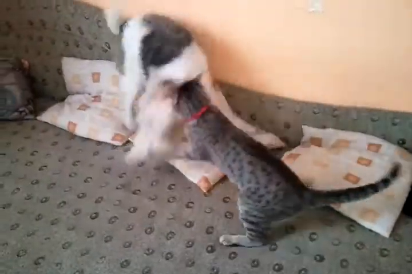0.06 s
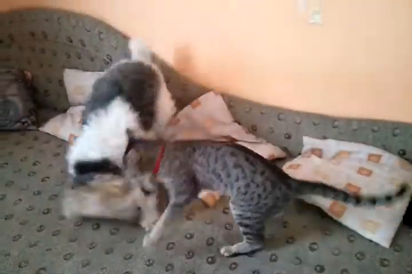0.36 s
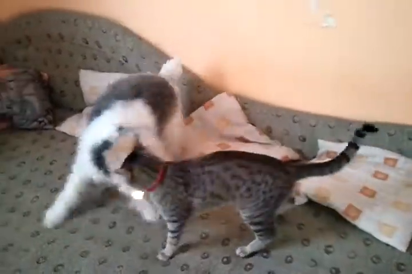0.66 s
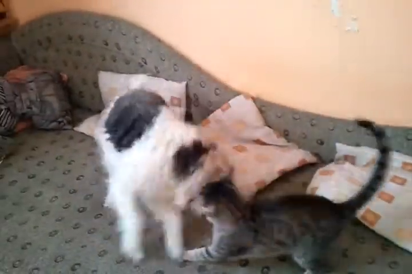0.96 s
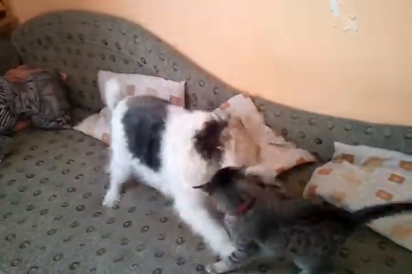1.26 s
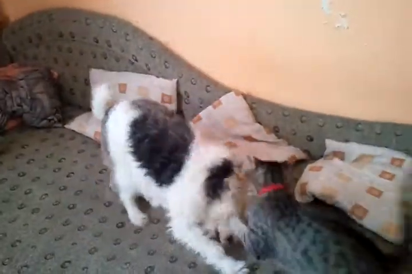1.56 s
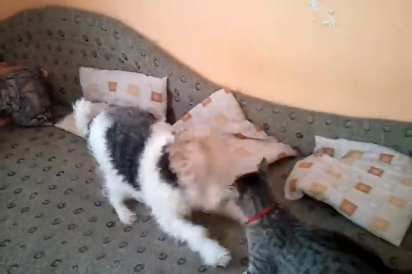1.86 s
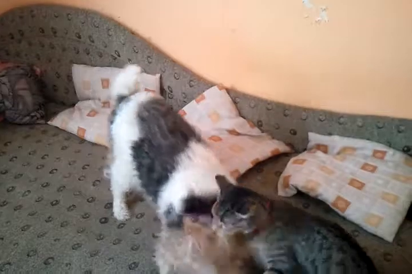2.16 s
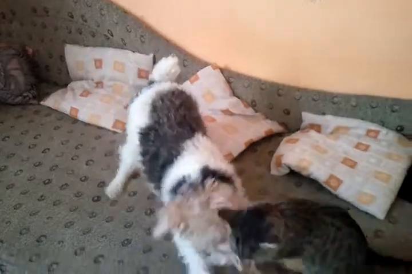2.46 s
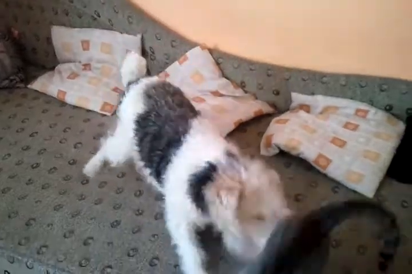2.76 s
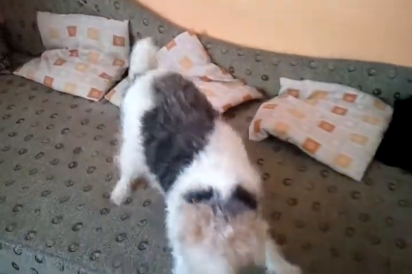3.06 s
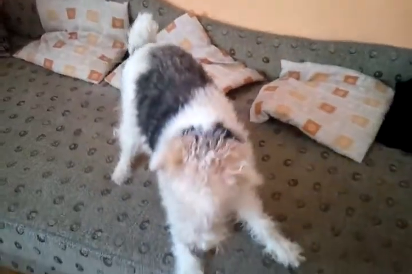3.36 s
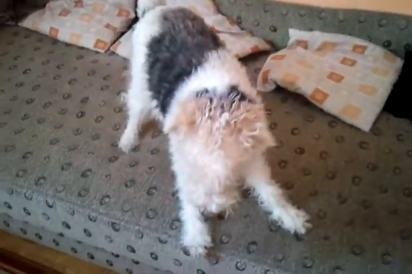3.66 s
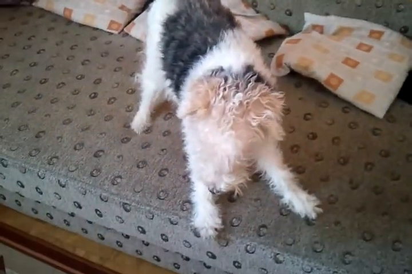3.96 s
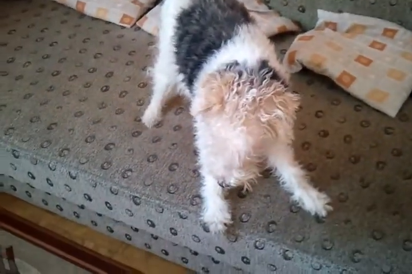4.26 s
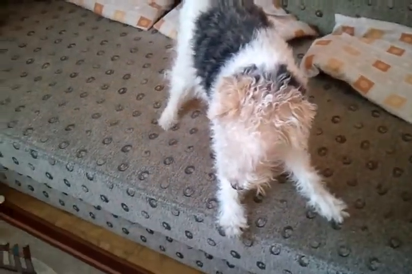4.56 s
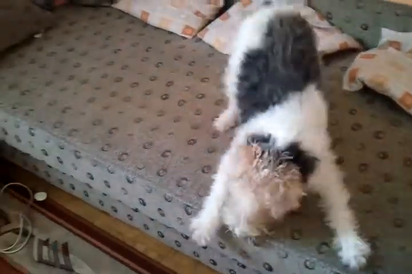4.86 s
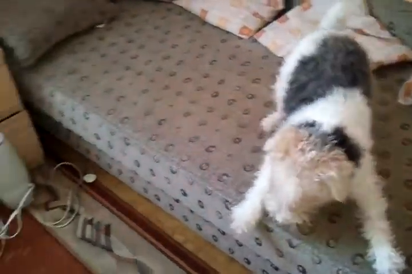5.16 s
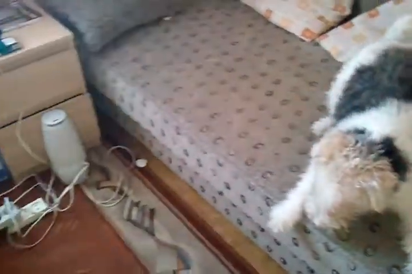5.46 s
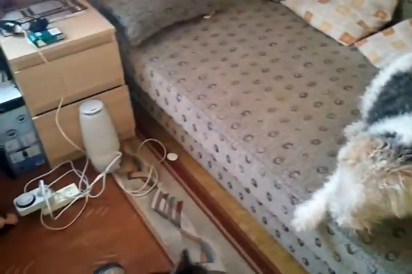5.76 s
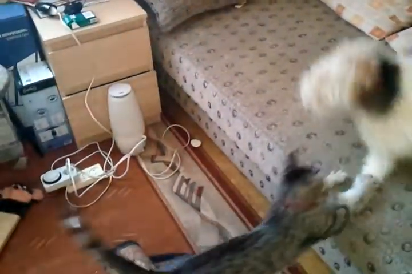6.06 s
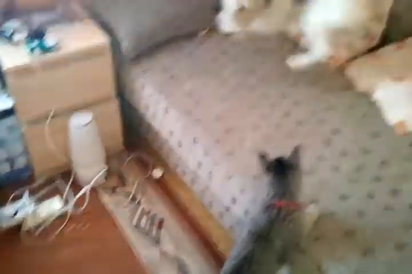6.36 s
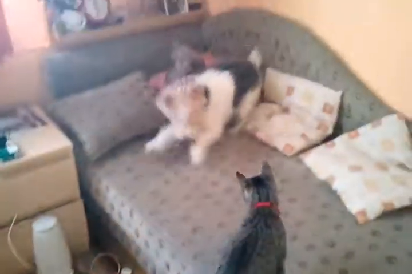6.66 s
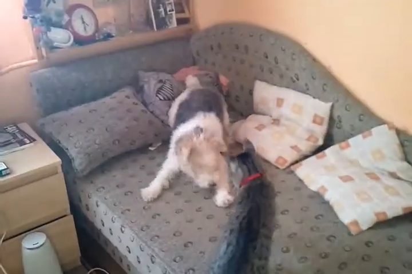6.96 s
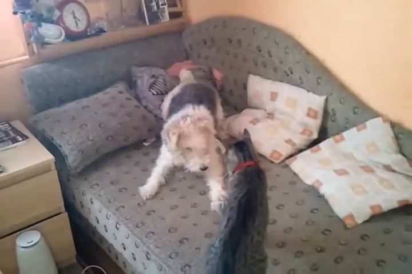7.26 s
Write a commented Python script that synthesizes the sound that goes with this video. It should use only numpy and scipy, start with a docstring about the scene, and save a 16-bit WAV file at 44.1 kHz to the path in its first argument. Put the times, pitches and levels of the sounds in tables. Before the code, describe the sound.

A dog and a cat wrestle on a sofa in a small, quiet room. Paws thump the cushions and hollow frame, fur and claws scrape the cover, and a small bell on the cat's collar jingles brightly with each lunge. Midway the thumps ease while the bell tinkles on. After a brief shuffle and a lull, the thudding and jingling return. A faint deep rumble lies underneath.

```python
"""Dog and cat wrestling on a sofa

In a small, quiet room, paws thump the cushions and the hollow frame over a deep rumble.
Fur and claws scrape across the cover. With every lunge, the pellet in a small bell
on the cat's collar strikes the metal shell and rattles around inside it."""
import sys
import numpy as np
from scipy import signal
from scipy.fft import rfft, irfft
from scipy.io import wavfile

SR = 44100
rng = np.random.default_rng(int(sys.argv[2]) if len(sys.argv) > 2 else 0)


def transcribe(u):
    """Save the signal u as a 16-bit wav file named by the first command-line argument.

    u: samples, shape (n,) or (channels, n), limited to [-1, 1]; the rate is SR.
    q: integer samples, one column per channel.
    """
    v = np.clip(np.atleast_2d(u).T, -1, 1)
    q = np.round(v * 32767).astype(np.int16)
    wavfile.write(sys.argv[1], SR, q)


N = 326295
TIME = np.arange(N) / SR
AGE = TIME[:SR // 2]  # seconds since one short sound began


def undb(db):
    """Turn decibels into a gain to multiply by."""
    return 10 ** (np.asarray(db) / 20)


def unit(x):
    """Scale a sound to an average (rms) level of 1."""
    return x / np.sqrt(np.mean(x ** 2))


def add(track, start_s, sound):
    """Mix a sound into the track at its start time."""
    start = max(int(start_s * SR), 0)
    track[start:start + len(sound)] += sound[:max(N - start, 0)]


def colour(x, points):
    """Filter a sound to follow a tone curve of (Hz, dB) points, at an average level of 1."""
    hz, db = np.transpose(points)
    freqs = np.maximum(np.fft.rfftfreq(2 * SR, 1 / SR), 1)
    gains = undb(np.interp(np.log(freqs), np.log(hz), db))
    # this keeps the filter from ringing before the sound arrives
    cepstrum = irfft(np.log(gains))
    cepstrum[1:SR] *= 2
    cepstrum[SR:] = 0
    response = irfft(np.exp(rfft(cepstrum)))[:SR // 2]
    return unit(signal.fftconvolve(x, response)[:len(x)])


def noise(points):
    """Steady noise that follows a tone curve."""
    return colour(rng.standard_normal(N), points)


def fade(t60):
    """Die away by 60 dB in t60 seconds, the fade time."""
    return np.exp(-np.log(1000) * AGE / t60)


def wander(rate, size):
    """Drift to a new random value, rate times a second."""
    targets = rng.standard_normal(4096)
    return np.interp(TIME[:size] * rate, np.arange(len(targets)), targets)


def grains(rate, spread_db):
    """Tiny random clicks, about rate a second: most are weak, a few are strong."""
    happens = rng.random(N) < rate / SR
    strength = np.minimum(rng.exponential(size=N), 5)
    return happens * undb(spread_db * strength) * rng.choice([-1, 1], N)


def room(x, echo_db, t60):
    """Add the short echo of a furnished room."""
    tail = rng.standard_normal(len(AGE)) * fade(t60) * (AGE > .003)
    return x + undb(echo_db) * signal.fftconvolve(x, tail / np.linalg.norm(tail))[:N]


# How the rumble rises and falls. Each row: time in seconds, level in dB.
RUMBLE_LEVELS = [(0.0, -28), (0.1, -31.5), (0.82, -46), (0.91, -37.5), (1.3, -50), (1.38, -32),
                 (1.59, -46.5), (2.47, -37.5), (2.66, -52.5), (2.78, -42), (4.53, -67.5), (4.88, -29.5),
                 (5.23, -53.5), (5.85, -56), (5.98, -31.5), (6.45, -33.5), (7.36, -48), (7.4, -63)]
# Tone curves of the rumble and the quiet room. Each row: frequency in Hz, level in dB.
RUMBLE_TONE = [(5, -12.5), (10, 3.5), (14, 5), (21, -7), (35, -15.5), (60, -34), (110, -54.5), (300, -64)]
QUIET_ROOM_TONE = [(25, 20.5), (50, 15.5), (70, -3.5), (102, 8.5), (140, -2), (260, -7.5), (380, -9),
                   (490, -3.5), (700, -10.5), (2000, -14), (9000, -14.5), (14500, -18)]


def background(room_db=-60.5):
    """A deep rumble swells as the animals bounce, over the faint hiss of the room."""
    times, levels_db = np.transpose(RUMBLE_LEVELS)
    rumble = undb(np.interp(TIME, times, levels_db)) * noise(RUMBLE_TONE)
    return rumble + undb(room_db) * noise(QUIET_ROOM_TONE)


# The notes of the box under the seat. Each row: pitch in Hz, level in dB, fade time in seconds.
BOX_NOTES = [(261.9, 16.5, 0.15), (369.7, 8.5, 0.24), (447, -29, 0.36), (588, 7, 0.25), (673, 4.5, 0.2),
             (797, 8, 0.34), (992, 9.5, 0.012), (1120, 4.5, 0.013), (1248, 4, 0.13), (1382, -0.5, 0.075),
             (1723, 0.5, 0.13), (2220, -9, 0.14)]


def hollow_box(x, ring_db=-13):
    """A touch on the seat also rings the hollow box below it."""
    ring = sum(undb(db) / np.sqrt(t60) * fade(t60) * np.sin(2 * np.pi * hz * AGE)
               for hz, db, t60 in BOX_NOTES)
    return x + undb(ring_db) * signal.fftconvolve(x, ring / np.linalg.norm(ring))[:N]


def push(length_s, release_s, rise_s=0.025):
    """The loudness of one slide: the push builds up, then friction stops the body."""
    return np.minimum(AGE / rise_s, 1) * np.exp(-np.maximum(AGE - length_s, 0) / release_s)


# A body or paw slides over the sofa. Each row: start in seconds, length of the push in seconds,
# cover scrape in dB, fur hiss in dB, seat shudder in dB.
BODY_SLIDES = [(0.0, 0.01, -44, -52, -44), (0.059, 0.071, -59.5, -74, -40),
               (0.241, 0.036, -49.5, -54.5, -56), (0.30, 0.079, -64, -65, -58.5),
               (0.481, 0.17, -58.5, -64, -57), (0.654, 0.052, -45, -59.5, -80),
               (0.698, 0.027, -40.5, -66, -68), (0.798, .07, -57.5, -58.5, -49.5),
               (0.88, 0.062, -60, -72, -54.5), (0.976, 0.067, -62, -51.5, -66),
               (1.088, 0.026, -54, -68, -82), (1.134, 0.019, -88, -48.5, -82), (1.2, 0.15, -82, -63, -68),
               (1.334, 0.12, -57, -61, -54.5), (1.496, 0.016, -50.5, -53, -58),
               (1.598, 0.069, -66, -52.5, -55.5), (1.728, .06, -57.5, -62.5, -73),
               (1.818, 0.055, -61.5, -69, -55), (2.06, 0.029, -52, -57, -47.5),
               (2.109, 0.078, -53.5, -54.5, -53), (2.173, 0.057, -52.5, -50.5, -50.5),
               (2.268, 0.13, -58.5, -59, -56), (2.399, 0.068, -66, -56.5, -83),
               (2.479, 0.034, -59, -78, -65), (2.658, 0.029, -61, -66.5, -62),
               (2.724, .1, -51, -57.5, -56.5), (2.83, 0.086, -54.5, -58.5, -57),
               (2.909, 0.038, -52, -53.5, -45), (2.973, 0.065, -47.5, -58, -50),
               (3.178, 0.091, -73, -59, -64), (4.59, .05, -73, -72, -73.5), (4.718, 0.027, -44, -47.5, -51),
               (4.76, 0.017, -63, -68, -56), (4.808, 0.078, -58, -66, -55), (5.168, 0.037, -68.5, -64, -63),
               (5.923, .04, -51.5, -57.5, -50), (5.964, 0.059, -43, -54.5, -53),
               (6.034, 0.054, -46.5, -52.5, -60), (6.112, 0.078, -51.5, -60, -56),
               (6.163, 0.072, -47.5, -51, -50.5), (6.274, 0.037, -53, -55.5, -62),
               (6.446, .075, -45.5, -56, -50.5), (6.568, 0.096, -56.5, -60.5, -55),
               (6.678, 0.041, -55.5, -54.5, -74), (6.778, 0.14, -55.5, -61, -48),
               (7.12, 0.051, -58, -77, -60), (7.364, .04, -55.5, -66, -56)]
# Tone curves of the cover, the fur and the seat. Each row: frequency in Hz, level in dB.
COVER_TONE = [(150, -21.5), (300, -1), (500, -1), (850, 0), (1350, 3), (2050, -2), (2900, -12.5),
              (4200, -15.5), (6000, -40)]
FUR_TONE = [(1500, -5.5), (2900, -15.5), (4200, 0.5), (6000, -5), (7800, 1), (9500, -5), (11200, -7.5),
            (12200, -17), (15000, -36)]
SEAT_TONE = [(40, -25), (70, 5), (105, -2), (135, -2), (170, 7), (210, -12.5), (265, 2), (400, -9),
             (600, -13), (1100, -42)]


def sliding(level_db=-1, jerk_db=2):
    """Bodies slide in jerks: the woven cover rasps, fur hisses and the seat shudders."""
    cover, fur, seat = np.zeros((3, N))
    for start, length, cover_db, fur_db, seat_db in BODY_SLIDES:
        add(cover, start, undb(cover_db) * push(length, release_s=0.021))
        add(fur, start, undb(fur_db) * push(length, release_s=0.021))
        add(seat, start, undb(seat_db) * push(length, release_s=0.032))  # springs shake on longer
    jerks = undb(jerk_db * wander(55, N))
    rasp = cover * colour(grains(rate=1000, spread_db=1), COVER_TONE)
    hiss = fur * colour(grains(rate=6300, spread_db=3), FUR_TONE)
    shudder = seat * noise(SEAT_TONE)
    slides = hollow_box(jerks * rasp) + jerks * (hiss + shudder)
    return undb(level_db) * room(slides, echo_db=-10, t60=0.33)


# Claws catch in the cover. Each row: start in seconds, level in dB.
CLAW_CATCHES = [(0.174, -37), (0.64, -56), (0.671, -40), (0.6985, -31), (0.7166, -40), (0.853, -36),
                (1.483, -38), (2.0654, -37.5), (2.942, -40.5), (4.7349, -41.5), (4.7707, -34.5),
                (4.88, -57), (6.2887, -36), (6.7255, -42)]
# Tone curve of a snapping thread. Each row: frequency in Hz, level in dB.
SNAP_TONE = [(300, 5), (900, -6), (1700, -1.5), (2800, -6.5), (4500, -7), (8000, -10.5), (14000, -42)]


def claws(level_db=-2, snap_t60=0.016):
    """Threads snap off the claw tips, each a tiny burst of noise."""
    snaps = np.zeros(N)
    for start, db in CLAW_CATCHES:
        add(snaps, start, undb(db + level_db) * fade(snap_t60))
    return room(snaps * noise(SNAP_TONE), echo_db=1.5, t60=0.15)


# Paws land on the sofa. Each row: start in seconds, pat on the cover in dB, boom of the frame in dB,
# pitch of the spot that is hit in Hz.
PAW_LANDINGS = [(0.02, -56, -35.5, 288), (0.065, -26, -21, 336), (0.172, -31, -37, 254),
                (0.209, -42, -38, 275), (0.264, -54, -46, 238), (0.3, -36.5, -49.5, 350),
                (0.395, -36.5, -55, 765), (0.473, -39.5, -53, 242), (0.638, -33, -77, 1390),
                (0.802, -37.5, -48.5, 378), (0.812, -34, -54, 586), (0.961, -43.5, -53.5, 258),
                (1.339, -32.5, -52, 296), (1.484, -26, -76, 760), (1.738, -52.5, -64, 266),
                (1.835, -38, -65, 237), (1.872, -44, -56, 252), (1.918, -42, -55, 256),
                (2.063, -33.5, -44, 587), (2.2, -29, -40.5, 240), (2.325, -38, -54, 926),
                (2.754, -40, -70, 353), (2.941, -41, -45, 285), (2.993, -28, -44, 1080),
                (3.182, -39, -51, 224), (4.739, -34.5, -66, 415), (4.766, -31.5, -66, 260),
                (4.869, -36, -50, 384), (5.067, -51.5, -70, 252), (5.98, -29.5, -68, 258),
                (6.004, -25, -49, 282), (6.091, -63, -41, 242), (6.284, -29.5, -47.5, 2550),
                (6.454, -40.5, -42, 286), (6.508, -42, -59, 940), (6.576, -30.5, -45.5, 607),
                (6.785, -32.5, -48, 260), (6.826, -33, -39, 330), (6.894, -60, -42, 275),
                (7.038, -45.5, -79, 243), (7.126, -41.5, -82, 270), (7.371, -37.5, -70, 235)]
# The low notes of the sofa frame. Each row: pitch in Hz, level in dB, fade time in seconds.
FRAME_NOTES = [(102, 2, .27), (57, -3, .2), (170, -4, .19), (258, -9, .17), (355, -14, .15),
               (440, -18, .12)]
# Tone curves of a pat on cloth and a knock on wood. Each row: frequency in Hz, level in dB.
PAT_TONE = [(80, -26), (170, -11), (280, 0.5), (500, -3), (1000, 0), (1800, 0), (2800, -10), (8000, -71)]
KNOCK_TONE = [(250, -32), (600, 6), (1000, -5), (1400, 7), (1900, -5), (2600, -23), (6000, -58)]


def paws(pat_gain_db=-3, boom_gain_db=4, knock_gain_db=11):
    """A soft paw pats the cover and pushes the frame into a short boom."""
    pats, knocks, boom = np.zeros((3, N))
    press = 1 - np.exp(-AGE / .004)
    swing = 1 - np.exp(-AGE / .014)
    cloth = noise(PAT_TONE)
    for start, pat_db, frame_db, spot_hz in PAW_LANDINGS:
        patch = np.roll(cloth, rng.integers(N))[:len(AGE)]
        pat = unit(signal.lfilter(*signal.iirpeak(spot_hz, Q=1, fs=SR), patch))
        add(pats, start, undb(pat_db + pat_gain_db) * press * fade(0.045) * pat)
        # doubling the dB means only a heavy landing flattens the padding and knocks on the wood
        add(knocks, start, undb(2 * frame_db + knock_gain_db) * press * fade(0.062))
        for hz, db, t60 in FRAME_NOTES:
            pitch_hz = hz * (1 + 0.025 * rng.standard_normal())  # each spot rings a bit differently
            note = np.sin(2 * np.pi * pitch_hz * AGE) * fade(t60)
            add(boom, start, undb(frame_db + boom_gain_db + db) * swing * note)
    return hollow_box(pats + knocks * noise(KNOCK_TONE)) + boom


def shell_ring(notes, waver, rise_s, vary_db):
    """One ring of the bell: each hit shares its energy anew, and echoes make the notes waver."""
    ring, age = 0, AGE[:SR // 5]
    for hz, db, t60 in notes:
        share, detune = rng.standard_normal(2)
        drift = wander(130, len(age)) + 1j * wander(150, len(age))  # shifts loudness and phase
        echo = drift * (1 - np.exp(-age / 0.0035))
        cycles = hz * (1 + .0008 * detune) * age + rng.random()
        note = np.exp(2j * np.pi * cycles - np.log(1000) * age / t60)
        ring += undb(db + vary_db * share) * np.real((1 + waver * echo) * note)
    return ring * (1 - np.exp(-age / rise_s))


# The pellet hits the bell. Each row: start in seconds, low notes in dB, twin notes in dB,
# bright notes in dB, sharpness of the hit (top notes and tick) in dB.
PELLET_HITS = [(0.019, -48, -49, -62, -83), (0.172, -37, -52, -77, -64), (0.6603, -41.5, -45.5, -32.5, -53),
               (0.8992, -45, -65, -54, -69), (0.9182, -39.5, -70, -45, -89),
               (0.9751, -41.5, -53, -41.5, -50.5), (1.1466, -50, -48, -71, -60),
               (1.1779, -43, -44, -73, -47.5), (1.1977, -46, -43.5, -79, -55), (1.264, -34, -49, -70, -67),
               (1.274, -26, -40, -64, -51.5), (1.296, -29, -58, -64, -49), (1.3211, -34, -39, -40.5, -48),
               (1.368, -44, -34.5, -73, -53), (1.4397, -38.5, -49, -66, -57),
               (1.4638, -37.5, -55, -58, -67), (1.5212, -30.5, -40.5, -34, -55),
               (1.5358, -73, -68, -27, -54), (1.5644, -76, -75, -27, -73), (1.6906, -47, -44, -43, -51),
               (1.8084, -41, -43, -43, -49), (1.8262, -39, -61, -72, -62),
               (1.9359, -31.5, -35.5, -33, -47.5), (1.9536, -62, -56, -37.5, -56),
               (1.9938, -44, -61, -45, -61), (2.2352, -26, -30, -29.5, -40.5),
               (2.266, -59, -58, -31.5, -56), (2.313, -69, -48, -36.5, -81), (2.3524, -45, -56, -31, -62),
               (2.3679, -40, -51, -35, -54), (2.97, -45, -59, -43, -70), (2.9863, -35, -44, -63, -63),
               (3.153, -49, -73, -65, -75), (3.2016, -39, -63, -75, -64), (3.2114, -44, -45, -50, -55),
               (3.2525, -46, -43.5, -65, -60), (3.3128, -49.5, -61, -67, -70), (3.3733, -40, -54, -70, -73),
               (3.3956, -66, -60, -60, -65), (3.45, -46.5, -62, -60, -74), (3.477, -46, -64, -60, -67),
               (3.506, -57, -61, -64, -76), (3.5974, -43, -57, -78, -72), (3.62, -43.5, -71, -66, -74),
               (3.708, -35.5, -49, -50.5, -55), (3.7351, -46, -49, -75, -65), (3.766, -46, -57, -56.5, -78),
               (3.8111, -44, -58, -50, -60), (3.845, -53, -55, -47.5, -72), (3.8652, -51, -51, -48, -66),
               (3.9391, -32, -66, -29.5, -45.5), (3.9615, -63, -78, -27.5, -56),
               (4.019, -42, -64, -66, -60), (4.0876, -38, -51, -75, -61), (4.114, -72, -60, -80, -74),
               (6.005, -55, -56, -70, -65), (6.0102, -38.5, -55, -61, -65), (6.1266, -41, -49, -78, -78),
               (6.212, -60, -60, -72, -61), (6.2227, -35, -46, -66, -60), (6.3542, -50, -61, -82, -83),
               (6.394, -47, -66, -84, -80), (6.529, -34, -46, -40, -46.5), (6.6455, -48.5, -54, -42, -72),
               (6.7075, -41, -47, -72, -73), (6.7329, -37, -39.5, -41.5, -47), (6.7601, -41, -57, -65, -66),
               (6.8471, -38.5, -46, -43, -51), (6.8708, -43, -66, -84, -64), (6.925, -49.5, -61, -60, -70),
               (7.077, -59.5, -63, -76, -74)]
# The notes of the slit metal shell, in four groups; the twins lie just above the main low notes.
# Each row: pitch in Hz, level in dB, fade time in seconds.
LOW_NOTES = [(4642, -5.5, .13), (4565, -16, .05), (4755, -15, .06), (4420, -24, .04), (6785, -29, .15)]
TWIN_NOTES = [(5165, -1, .1), (5340, -8, .06), (4980, -13, .05), (5560, -15, .04)]
BRIGHT_NOTES = [(9669, 3, .19), (12920, -22, .14)]
TOP_NOTES = [(9900, -10, .06), (11050, -8, .06), (11460, -5, .08), (11850, -13, .05), (12930, -10, .11),
             (14470, -15, .12)]
# Tone curves of the pellet's tick and rattle. Each row: frequency in Hz, level in dB.
TICK_TONE = [(1000, -62), (3000, -42), (4600, -16), (6500, -3), (11000, 8), (15000, -4)]
RATTLE_TONE = [(1000, -55), (3300, -46), (4200, -8.5), (4650, 15.5), (4950, 4), (5250, 6), (5700, 2),
               (6300, -8.5), (8500, -11), (9700, -11), (11300, -7), (12300, -33), (14500, -31)]


def collar_bell(tick_gain_db=9, rattle_gain_db=-18):
    """Each hit ticks and rings the shell; the pellet then rattles around inside it."""
    ring, tick_level, rattle_level = np.zeros((3, N))
    tick_shape = fade(0.0073) + undb(-13) * fade(0.11)  # a tick, then a sizzle as the pellet settles
    for start, low_db, twin_db, bright_db, sharp_db in PELLET_HITS:
        add(ring, start, undb(low_db) * shell_ring(LOW_NOTES, waver=.7, rise_s=.0003, vary_db=1))
        add(ring, start, undb(twin_db) * shell_ring(TWIN_NOTES, waver=.9, rise_s=.0003, vary_db=1.5))
        add(ring, start, undb(sharp_db) * shell_ring(TOP_NOTES, waver=.8, rise_s=.001, vary_db=3))
        # a rolling pellet swells the bright notes, a sharp blow starts them at once
        swell_s = .0005 * undb(.55 * np.clip(bright_db - sharp_db, 0, 40))
        bright = shell_ring(BRIGHT_NOTES, waver=.28, rise_s=swell_s, vary_db=0)
        add(ring, start, undb(bright_db) * bright)
        add(tick_level, start, undb(sharp_db + tick_gain_db) * tick_shape)
        add(rattle_level, start, undb(low_db + rattle_gain_db) * fade(0.28))
    tick_rms = np.sqrt(np.mean(tick_level ** 2))
    ticks = tick_rms * colour(tick_level * rng.standard_normal(N), TICK_TONE)
    rattle = rattle_level * colour(grains(rate=520, spread_db=0.8), RATTLE_TONE)
    return room(ring + ticks + rattle, echo_db=-22, t60=0.16)


def scene():
    """Add all the sounds together in one channel."""
    return (collar_bell() + paws() + claws() + sliding() + background())[None]


def record(dry):
    """Cut away the highest treble."""
    top_hz = 14600
    return signal.sosfilt(signal.ellip(8, .2, 70, top_hz, fs=SR, output="sos"), dry)


dry = scene()
out = record(dry)
transcribe(out)
```